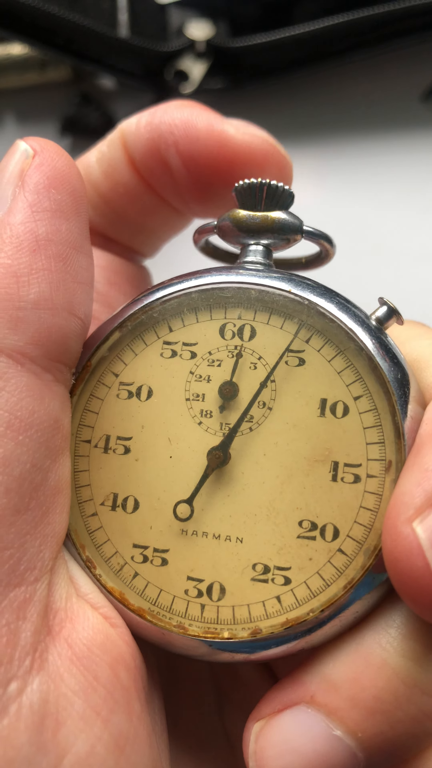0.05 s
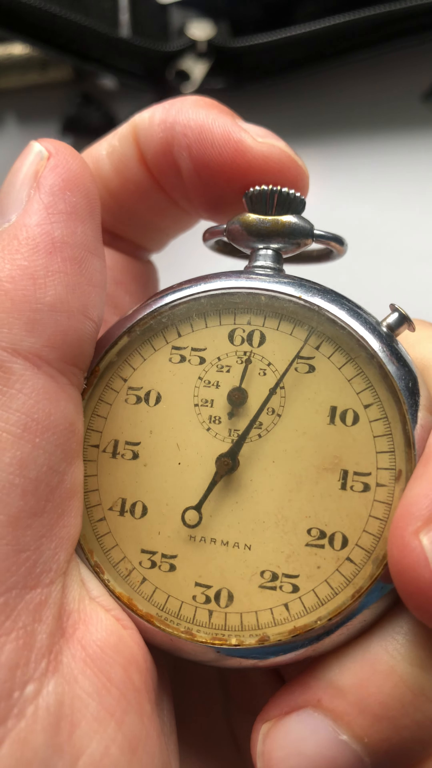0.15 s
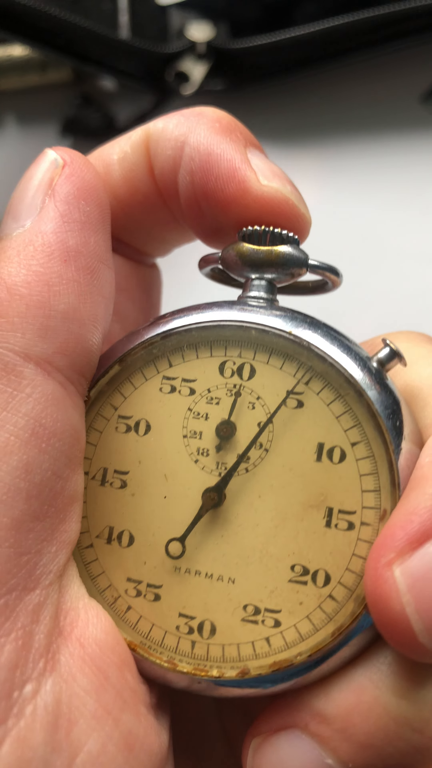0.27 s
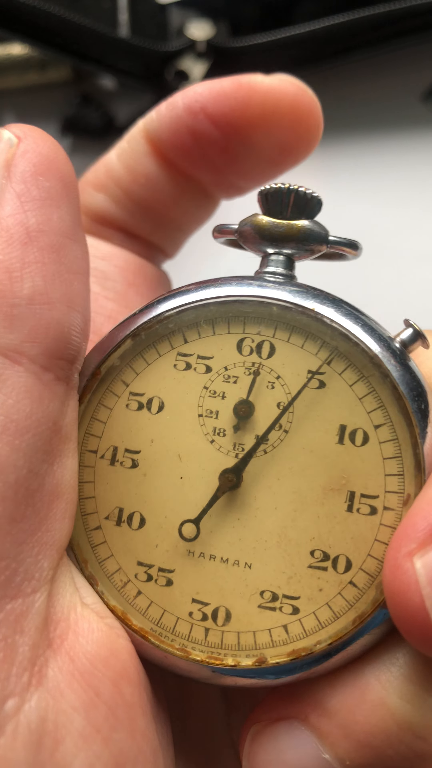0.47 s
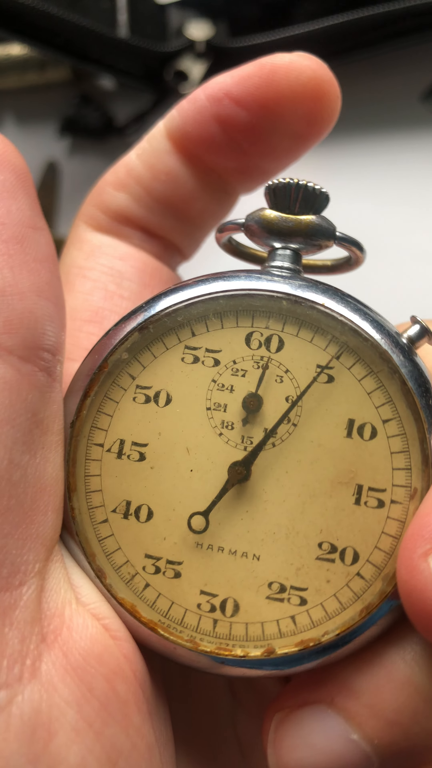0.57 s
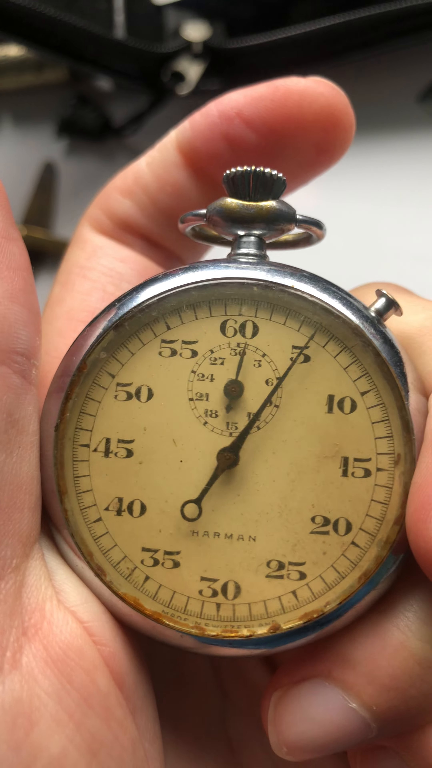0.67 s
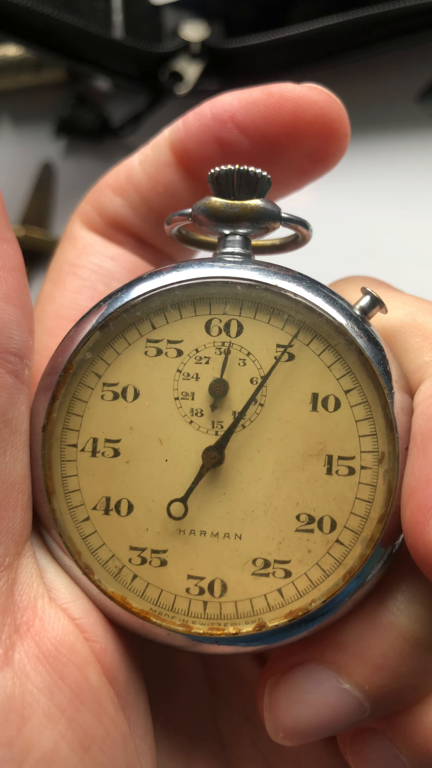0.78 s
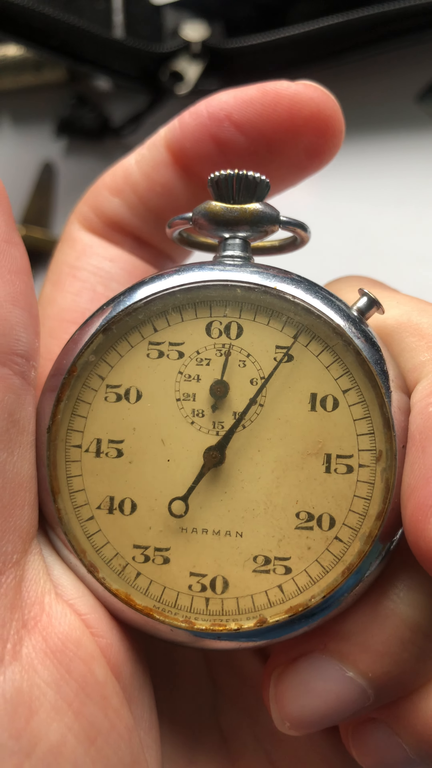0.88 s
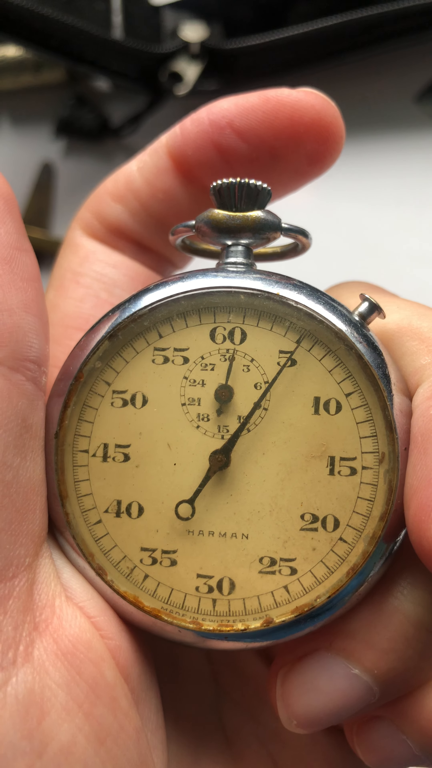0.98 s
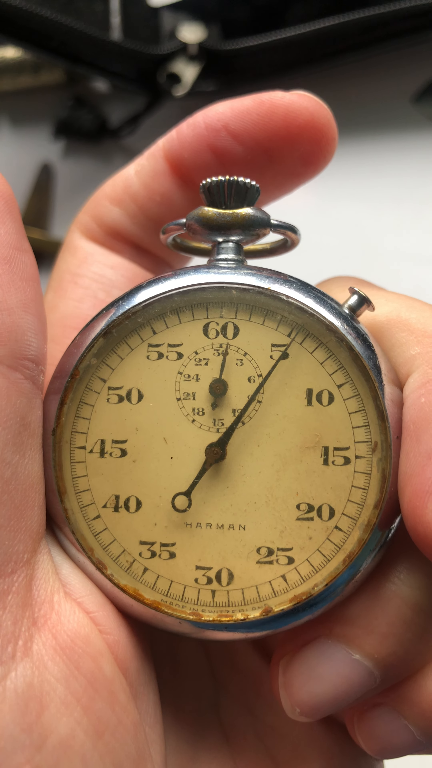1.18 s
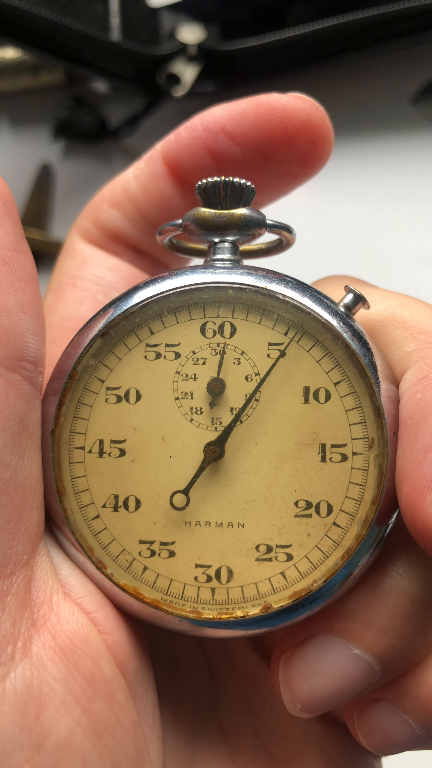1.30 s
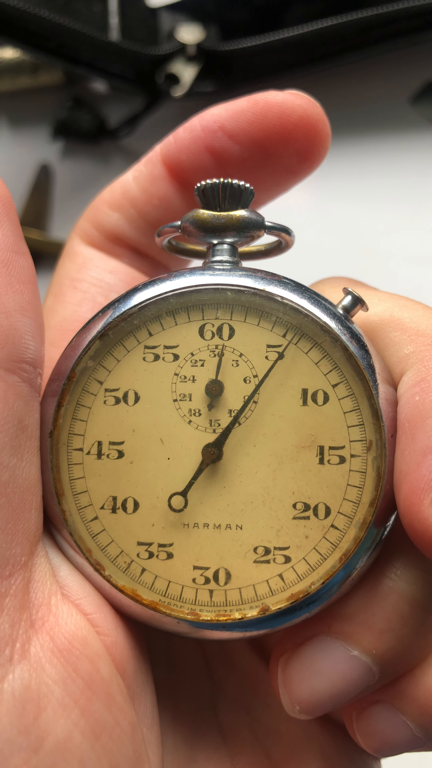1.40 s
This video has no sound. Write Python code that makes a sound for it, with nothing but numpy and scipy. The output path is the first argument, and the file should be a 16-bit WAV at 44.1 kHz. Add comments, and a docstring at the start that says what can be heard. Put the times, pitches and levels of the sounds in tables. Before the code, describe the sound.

Close up in a quiet room, a handheld stopwatch snaps sharply as a finger pushes the crown, and clicks again as it springs back with a slight ring. Light, even ticking continues, about five beats a second.

```python
"""A mechanical stopwatch, held in the hand close to one microphone in a quiet room.
A finger presses the crown: a lever slips and the hammer snaps over. The escapement starts ticking
five times a second. On release the crown slides and springs back, leaving its spring ringing, and
the hand gives with a soft bump. Every contact rings the same small metal case, damped by the hand.
Behind the watch lie a short room tail and a low room tone."""
import sys
import numpy as np
from scipy import signal
from scipy.fft import rfft, irfft
from scipy.io import wavfile

SR = 44100
rng = np.random.default_rng(int(sys.argv[2]) if len(sys.argv) > 2 else 0)


def store_wav(level_fs):
    """Save 16-bit WAV to argv[1]."""
    pcm = np.round(np.clip(np.atleast_2d(level_fs), -1, 1) * 32767)
    wavfile.write(sys.argv[1], SR, pcm.T.astype(np.int16))


N = 63945
T = np.arange(N) / SR

# room tone spectrum: (frequency [Hz], relative density [dB])
AIR_COLOUR = [(15, -37.5), (25, -7), (190, -0.5), (489, -9), (677, -13.5), (775, -13.5), (936, -15),
              (1290, -17), (1610, -20), (2000, -19), (2690, -23), (3720, -23), (4490, -24), (14800, -32),
              (16000, -34.5)]
# what the room returns to the microphone: (frequency [Hz], level [dB])
ROOM_COLOUR = [(200, -7.5), (600, -17.5), (1200, -18.5), (2000, -21), (2450, -18), (2870, -27), (3300, -12),
               (3780, -20.5), (4300, -17), (5000, -22.5), (5500, -26), (6700, -14), (8800, -26),
               (11000, -20.5), (16000, -21)]
# bump of the hand: (frequency [Hz], relative level [dB])
BUMP_COLOUR = [(130, -3.5), (250, 2.5), (450, -11), (900, -14), (2000, -32), (8000, -61)]
# how each part lands, in the order lever, hammer, crown, escapement, stem:
# part -> (rise [s], t60 of the crack at 4 kHz [s], factor on the ring time of the case [ratio])
PART_CONTACTS = {"lever": (.0004, .018, 1.02), "hammer": (.0005, .02, 0.96), "crown": (0.00087, .015, 1),
                 "escapement": (0.00094, 0.027, 1.8), "stem": (.0005, 0.021, 1.4)}
# modes of the metal case: (frequency [Hz], base t60 [s], relative level for each of the five parts [dB])
CASE_MODES = [(617, .008, -29.5, -24, -30.5, -29.5, -30), (913, .009, -32.5, -19, -23.5, -28, -30),
              (1190, .016, -10, -31, -9.5, -20.5, -15), (1771, 0.012, -11.5, -0.5, -1.5, -19, -12.5),
              (1944, .026, -5, 9, -21, -16, -8), (2080, 0.028, -11.5, -2.5, -18.5, -18.5, 6),
              (2328, 0.024, 2.5, 2, -3.5, -10.5, -0.5), (2848, 0.015, -7, -16, 7, -6, -9),
              (3010, .022, 0.5, -5, -3, 1, -5), (3793, 0.047, -12, -4, 1, -13.5, -10),
              (4932, .012, -4.5, -3.5, 0, -6.5, -14), (5236, 0.022, 4, -5, -13, 1.5, -11.5),
              (5510, .018, 2, 0, 0.5, 3.5, 0), (6310, 0.064, -18, -18, -7, -6.5, -21),
              (7560, .016, -14, -12.5, -4.5, -11, -24), (8204, 0.01, -19, -12, -20, -20, -25),
              (8766, 0.0073, -17.5, -5.5, -17, -7, -17), (9250, 0.012, -23, -12, -21, -10, -28),
              (10200, .009, -17.5, -13, -24, -4, -30.5), (11570, .009, -12.5, -8.5, -9.5, -15, -23.5),
              (12650, .009, -22, -23, -9.5, -6, -28), (13240, 0.029, -21.5, -9, -17, -10.5, -18),
              (14400, 0.012, -20, -9, -14.5, -7.5, -34), (15300, .011, -21, -11, -8.5, -6, -23)]
# the crack, a crowd of short-lived modes: (frequency [Hz], relative level for each of the five parts [dB])
CRACK_COLOUR = [(200, -32, -36, -24, -30, -32), (500, -25, -30, -27, -26, -27),
                (930, -22, -22, -27, -22.5, -25), (1600, -12, -14.5, -12, -18, -16),
                (2501, -8.5, -18, -14, -11, -6.5), (3700, -17, -18.5, -18, -20, -14.5),
                (5500, -11, -16, -9.5, -10, -12.5), (6940, -16, -21.5, -19.5, -18, -23),
                (9100, -20, -14, -21, -14.5, -27), (12000, -23.5, -18, -10.5, -18, -28.5),
                (15500, -21.5, -20.5, -16, -13, -28)]
# escapement beats: three tiny clicks each (time [s], level [dB]); the last listed also rings small parts
BEAT_CONTACTS = [(0.2915, -30.5, 0.27, -22, .3228, -23.5), (.5050, -23, .5185, -20.5, .5385, -31),
                 (.7023, -38, .7135, -28, .7322, -21.5), (0.8939, -31, .9085, -30.5, .9258, -24),
                 (1.1027, -37, 1.1163, -27.5, 1.1331, -22.5), (1.2912, -30.5, 1.3119, -30.5, 1.3278, -23)]
# those small parts: (frequency [Hz], t60 [s], level on tick [dB re click], level on tock [dB re click])
BEAT_PINGS = [(2500, 0.092, -48, -73.5), (2785, 0.08, -42, -56), (4640, 0.081, -47.5, -44.5),
              (5730, .08, -51, -43.5), (6620, .07, -53, -53), (9530, 0.034, -64, -41.5),
              (11200, 0.053, -55, -48)]
# clicks of the crown mechanism: (time [s], part, level [dB], treble tilt [dB/octave])
CROWN_CLICKS = [(0.0116, "stem", -24, -2.5), (0.0174, "stem", -15, -2.5), (.0222, "stem", -15.5, -3.5),
                (0.2093, "stem", -34, -5.5), (0.2281, "lever", -16, 3), (0.2394, "lever", 5, 1),
                (0.2635, "lever", -1.5, 4.5), (0.2654, "hammer", 14.5, 1), (.2928, "crown", -26.5, -2),
                (0.4557, "hammer", -29, -8), (0.4808, "crown", -31.5, 0.5), (.4840, "stem", -15.5, -4.5),
                (0.4936, "crown", -11.5, 2.5), (0.4953, "crown", 5, 0), (0.5016, "lever", -13, 1),
                (.5153, "stem", -8, -5)]
# the stem rubs in its sleeve: (time [s], length [s], level [dB])
STEM_SLIDES = [(0.214, 0.037, -65), (0.47, 0.038, -61.5)]
# spectrum of that rubbing: (frequency [Hz], relative level [dB])
STEM_COLOUR = [(500, -18), (2000, 0.5), (3000, -3), (4000, -7.5), (5500, -3.5), (8000, -12.5),
               (16000, -12.5)]
# lightly damped springs and plates: (time [s], frequency [Hz], level [dB], t60 [s])
SPRING_RINGS = [(.266, 1066, -66, .6), (.266, 1905, -46.5, .16), (.266, 3790, -55, .09),
                (.266, 5315, -58.5, .15), (.266, 6640, -53, .12), (0.4956, 1068, -69.5, .35),
                (0.4971, 5551, -60.5, 0.4)]


def from_db(db):
    """Decibels to gain."""
    return 10 ** (np.asarray(db) / 20)


def at_hz(points, hz):
    """Read a spectrum on a log-frequency axis."""
    points = np.array(points)
    return np.interp(np.log(np.maximum(hz, 1)), np.log(points[:, 0]), points[:, 1])


def add(out, start_s, sound):
    """Mix a sound in at a time."""
    i = int(start_s * SR)
    out[i:i + len(sound)] += sound[:N - i]


def high_pass(x, hz, order):
    """Roll off the bass."""
    return signal.sosfilt(signal.butter(order, hz, "high", fs=SR, output="sos"), x)


def swell(t, rise_s, t60):
    """Quick rise, exponential decay."""
    return (1 - np.exp(-(t / rise_s) ** 2)) * 1000.0 ** (-t / t60)


def noise(gain):
    """Steady noise with a gain given as a function of frequency; rms 1."""
    x = irfft(rfft(rng.standard_normal(N)) * gain(np.fft.rfftfreq(N, 1 / SR)), N)
    return x / x.std()


def dying_noise(spectrum, rise_s, t60, treble_damping, size):
    """Decaying noise bands; t60 holds at 4 kHz and falls with frequency to the power treble_damping."""
    edges_hz = np.geomspace(120, 17000, 23)
    bins_hz = np.fft.rfftfreq(size, 1 / SR)
    white, out = rfft(rng.standard_normal(size)), np.zeros(size)
    for low, high in zip(edges_hz, edges_hz[1:]):
        hz = np.sqrt(low * high)
        band = irfft(white * (bins_hz >= low) * (bins_hz < high), size)
        band *= swell(T[:size], rise_s, t60 * (hz / 4000) ** -treble_damping)
        band_share = 2 * (high - low) / SR   # of the energy of a flat spectrum
        out += band * from_db(at_hz(spectrum, hz)) * np.sqrt(band_share / np.sum(band ** 2))
    return out


def room_tone(air_db=-70.5, hum_db=-79, hum_hz=193, half_width_hz=25):
    """The quiet room behind the watch: low rumble, faint hiss and a narrow, wavering hum."""
    air = noise(lambda hz: from_db(at_hz(AIR_COLOUR, hz)))
    hum = noise(lambda hz: 1 / (1 + ((hz - hum_hz) / half_width_hz) ** 2))
    return from_db(air_db) * air + from_db(hum_db) * hum


def room_tail(sound, delay_s=0.0032):
    """A short diffuse tail that reaches the microphone just after the direct sound."""
    out = np.zeros(N)
    tail = dying_noise(ROOM_COLOUR, rise_s=0.0019, t60=0.17, treble_damping=0.17, size=16384)
    add(out, delay_s, signal.fftconvolve(sound, tail))
    return out


def hand(release_s=0.4965, level_db=-12.5):
    """Handling noise, close up: the hand gives with a dull bump as the finger lifts."""
    out = np.zeros(N)
    bump = dying_noise(BUMP_COLOUR, rise_s=0.002, t60=0.21, treble_damping=0, size=8192)
    add(out, release_s, from_db(level_db) * bump)
    return out


def ping(hz, level_db, t60):
    """One partial of a lightly damped metal part."""
    return from_db(level_db) * swell(T, rise_s=0.0005, t60=t60) * np.sin(2 * np.pi * hz * T)


def treble_tilt(hz, db_per_octave, pivot_hz=3000, flat_below_hz=1500):
    """Decibels by which a brighter or duller contact shifts a frequency."""
    return db_per_octave * np.log2(max(hz, flat_below_hz) / pivot_hz)


def strike(part, level_db, tilt=0, size=4096):
    """One contact: a crack and the case modes, alternating in sign, coloured by the part that strikes."""
    column, t = list(PART_CONTACTS).index(part), T[:size]
    rise_s, crack_t60, ring_factor = PART_CONTACTS[part]
    colour = [(hz, levels[column] + treble_tilt(hz, tilt)) for hz, *levels in CRACK_COLOUR]
    out = dying_noise(colour, rise_s, crack_t60, treble_damping=0.25, size=size)
    for n, (hz, t60, *levels) in enumerate(CASE_MODES):
        envelope = swell(t, rise_s, t60 * ring_factor)
        envelope *= 2 / envelope.sum()   # same resonance height whatever the ring time
        gain = (-1) ** n * from_db(levels[column] + treble_tilt(hz, tilt))
        out += gain * envelope * np.sin(2 * np.pi * hz * t)
    return from_db(level_db) * out


def escapement():
    """Three tiny clicks a beat; the last rings small parts as the two pallets take turns, tick, tock."""
    out = np.zeros(N)
    pings = [sum(ping(hz, levels[pallet], t60) for hz, t60, *levels in BEAT_PINGS) for pallet in (0, 1)]
    for n, beat in enumerate(BEAT_CONTACTS):
        for start_s, level_db in zip(beat[::2], beat[1::2]):
            add(out, start_s, strike("escapement", level_db))
        last_s, last_db = beat[-2:]
        add(out, last_s, from_db(last_db) * pings[n % 2])
    return out


def crown(grip_s=0.61, grip_t60=0.1):
    """Press and release: clicks, the rubbing stem and springs that ring until the grip damps them."""
    out, springs = np.zeros(N), np.zeros(N)
    for start_s, part, level_db, tilt in CROWN_CLICKS:
        add(out, start_s, strike(part, level_db, tilt))
    rub = noise(lambda hz: from_db(at_hz(STEM_COLOUR, hz)))
    for start_s, length_s, level_db in STEM_SLIDES:
        travel = np.clip((T - start_s) / length_s, 0, 1)
        out += from_db(level_db) * rub * np.sin(np.pi * travel)
    for start_s, hz, level_db, t60 in SPRING_RINGS:
        add(springs, start_s, ping(hz, level_db, t60))
    grip_damping = 1000.0 ** (-np.maximum(T - grip_s, 0) / grip_t60)
    return out + springs * grip_damping


def stopwatch():
    """What the small case radiates in one direction: little bass, and a crack unique to that direction."""
    return high_pass(crown() + escapement(), hz=380, order=3)


def scene(directions=3):
    """The watch close to the microphone, in mono; the room returns what it sends in other directions."""
    reverberation = sum(room_tail(stopwatch()) for _ in range(directions)) / np.sqrt(directions)
    return (stopwatch() + reverberation + hand() + room_tone())[None]


def record(dry, top_hz=15700):
    """The microphone rolls off the deep bass; the top is cut steeply."""
    thin = high_pass(dry, hz=27, order=2)
    return signal.sosfilt(signal.ellip(10, 0.2, 70, top_hz, fs=SR, output="sos"), thin)


dry = scene()
out = record(dry)
store_wav(out)
```